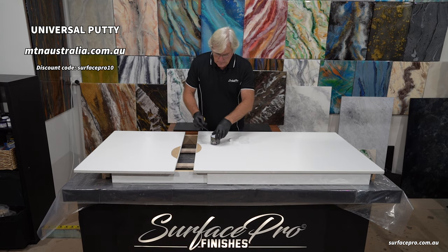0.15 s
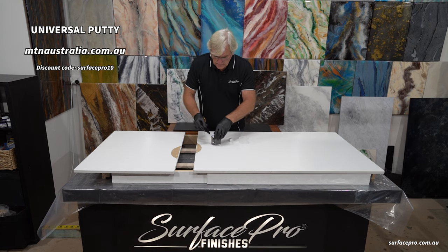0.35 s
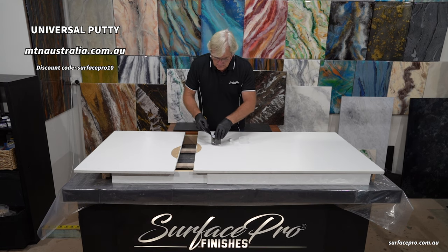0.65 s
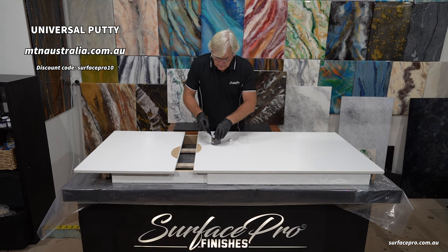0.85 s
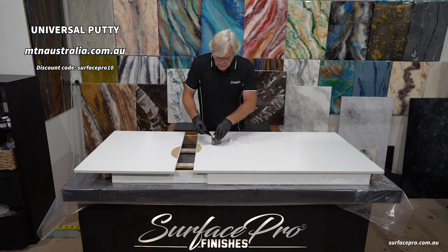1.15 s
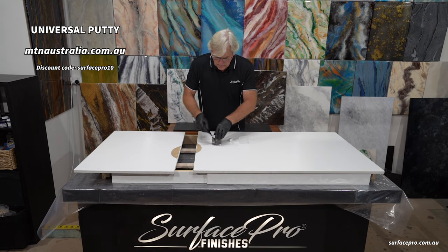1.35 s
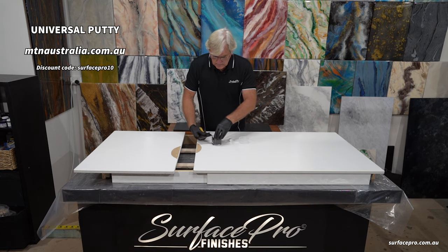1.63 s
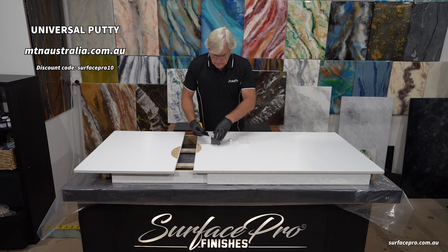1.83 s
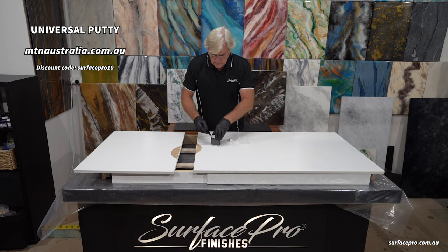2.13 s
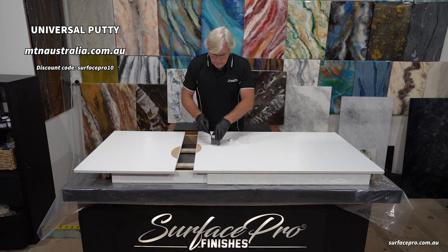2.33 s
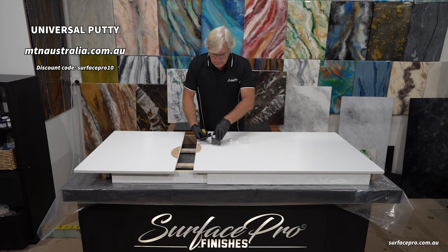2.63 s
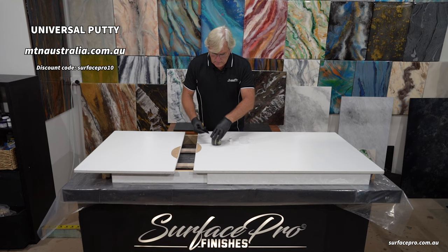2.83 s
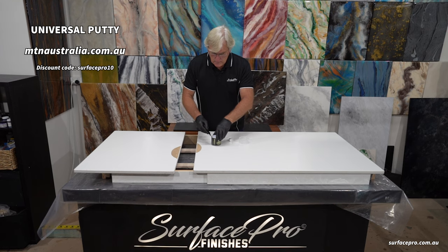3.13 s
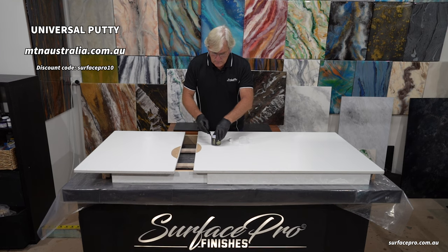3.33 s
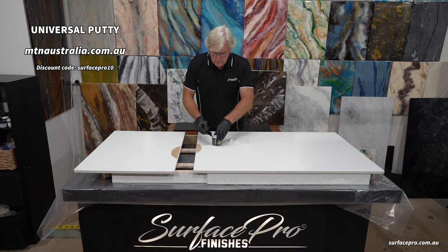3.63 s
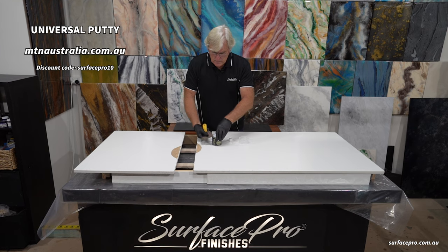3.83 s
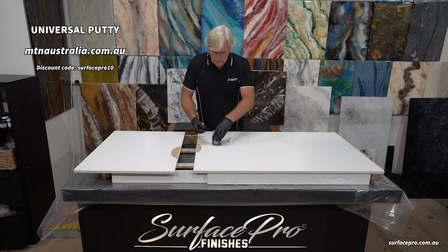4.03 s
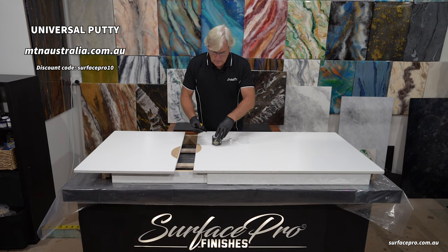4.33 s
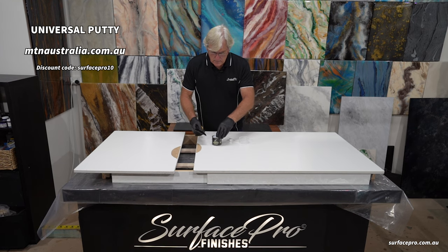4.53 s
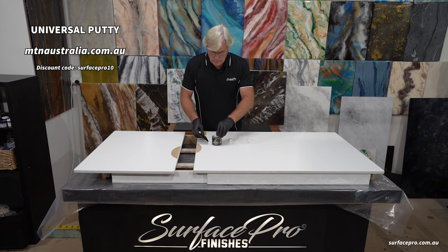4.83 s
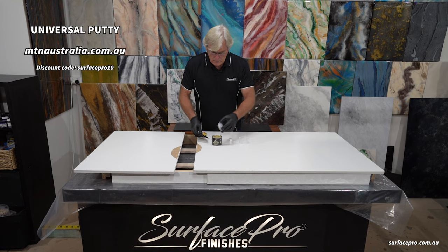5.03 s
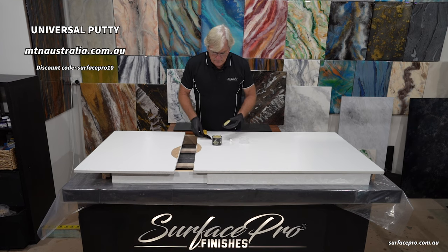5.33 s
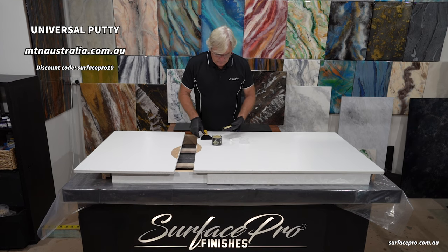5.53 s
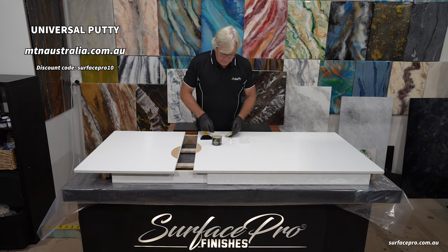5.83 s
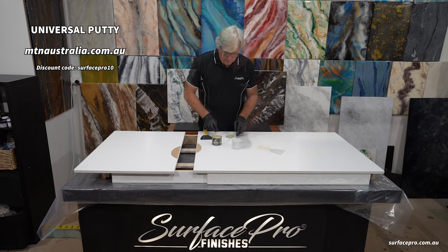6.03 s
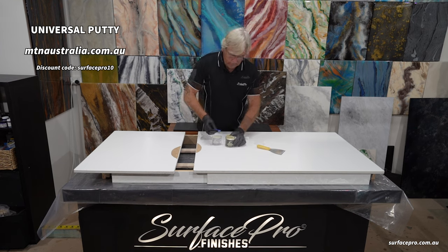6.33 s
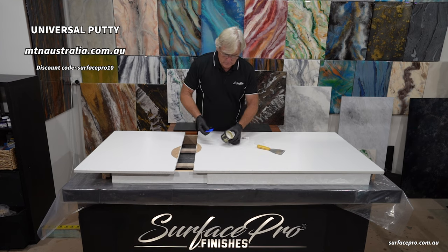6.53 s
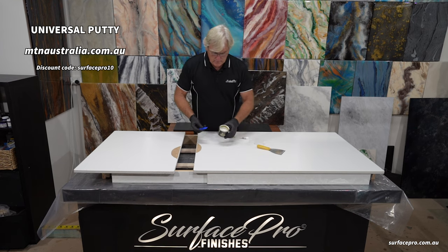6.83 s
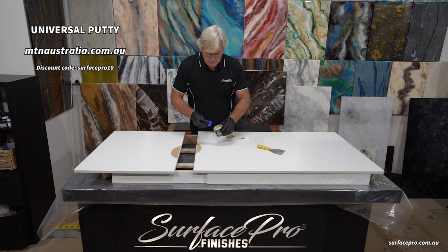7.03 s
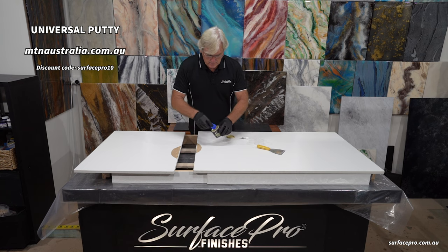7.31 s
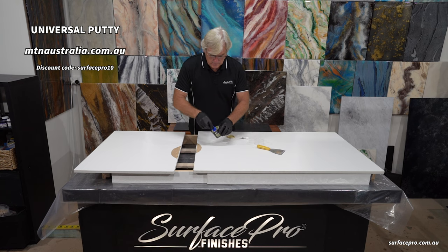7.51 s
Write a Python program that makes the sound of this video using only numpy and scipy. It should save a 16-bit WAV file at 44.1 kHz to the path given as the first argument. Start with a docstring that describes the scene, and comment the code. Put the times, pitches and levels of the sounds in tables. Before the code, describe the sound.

Close sounds of opening a tin on a workbench: faint knocks, a slow creak, hard blade scrapes with pauses, then a quick cluster of metallic flicks and a brief singing tone as the lid releases. A clunk, the lid scraping and ringing down, a rapid clatter of a loose knife on stone, then quiet rubbing and a soft low hum. Faint room air and thin whine beneath; tails cut short.

```python
"""Over room air and a thin whine, a small tin held in gloves shifts and knocks on a stone slab on a workbench.
A steel putty knife creeps along its rim, scrapes by stick and slip, and twangs on its modes as it slips free.
The lid gives way with a judder, the blade sings and flicks, and the lid is put down, scraping and ringing.
The knife is dropped and clatters to rest; a hum swells as the tin is picked up and turned in the gloves.
Noise reflections give each contact its room, and an expander shortens the tails of nearly all contacts."""
import sys
import numpy as np
from scipy import signal
from scipy.fft import rfft, irfft
from scipy.io import wavfile
from scipy.ndimage import uniform_filter1d

SR = 44100
rng = np.random.default_rng(int(sys.argv[2]) if len(sys.argv) > 2 else 0)


def dump_mix(stems):
    """Bounce the given channels to the path in sys.argv[1] as a 16-bit WAV at rate SR."""
    frames = np.atleast_2d(stems).T  # one column per channel
    limited = np.clip(frames, -1, 1)  # hard clip at full scale
    pcm = np.round(limited * 32767).astype(np.int16)
    wavfile.write(sys.argv[1], SR, pcm)


N = 338327
TIME = np.arange(N) / SR
RING_S = .55
AGE = np.arange(int(RING_S * SR)) / SR  # seconds since a contact

# Drags of the blade along the tin or over the slab, and one scrape of the lid as it is put down (5.546 s).
# Each row: start in seconds, build-up in seconds, level in dB, weight in dB, sharpness in dB,
# bending level in dB, tin wall level in dB, top of the wall's ring in Hz, shimmer level in dB.
SCRAPES = [(1.463, 0.021, -43.5, -6.5, 0.5, -51.5, -46.5, 1693, -65),
           (1.505, 0.0091, -29, -16.5, 5.5, -20, -22.5, 3800, -39.5),
           (1.551, 0.014, -37, -7, -4, -58, -31, 3860, -56.5),
           (2.554, 0.0056, -20.5, -16.5, -14.5, -23.5, -23.5, 3130, -54.5),
           (2.644, 0.012, -19.5, -38.5, -12.5, -55, -35.5, 4030, -67),
           (3.425, .0053, -49.5, 8, 9.5, -38.5, -48, 3800, -57.5),
           (3.779, 0.012, -15.5, -1.5, -13, -24.5, -28.5, 3460, -43.5),
           (4.081, 0.0081, -31.5, -29, -1, -39.5, -25.5, 1940, -27.5),
           (5.347, 0.01, -17, -5.5, -10.5, -38, -27.5, 1800, -48.5),
           (5.546, 0.0097, -28.5, -0.5, 6.5, -55, -52, 4000, -43.5),
           (6.037, .014, -36, -25, 20, -26.5, -40.5, 4050, -33.5),
           (6.075, 0.017, -39.5, 4.5, 1.5, -60.5, -35.5, 4030, -48.5)]
# Broad resonances of thin steel near its edge. Each row: frequency in Hz, width in Hz, peak in dB.
EDGE = [(2600, 580, -5), (4900, 55, 11), (6400, 2500, -1.5), (10800, 2800, -10.5)]
# Shimmering modes of the blade. Each row: frequency in Hz, level in the hand in dB, level lying loose in dB.
SHIMMER = [(4640, -14, -2), (4818, -1, 2), (4947, -1, -8), (5443, -9, -5), (6480, 1, -3), (6751, -1, -14),
           (6885, -5, -8), (7133, -3, -5), (8230, -7, -22), (8436, -4, -24), (8725, -1, -15),
           (10067, -4, -19), (10449, -6, -19), (11380, -15, -28), (12172, -14, -26), (15089, -14, -34)]
# Bending mode: lower while the blade is wedged under the lid, higher as the lid gives way.
# Each row: time in seconds, frequency in Hz.
BEND = [(1.5, 1037), (2.5, 1012), (4.0, 1077)]


def amp(db):
    """The decibel is logarithmic: 20 dB is a factor of ten in amplitude."""
    return 10 ** (np.asarray(db) / 20)


def unit(x):
    """Normalisation: mean power is set to 1."""
    return x / np.sqrt(np.mean(x ** 2))


def burst(x, db):
    """Energy equivalence: a short sound gets the energy of 50 ms at this rms level."""
    return x * amp(db) / np.sqrt(np.sum(x ** 2) / (.05 * SR))


def fade(t60):
    """Exponential decay: the level falls by 60 dB in t60 seconds."""
    return np.exp(-np.log(1000) * AGE / max(t60, 1 / SR))


def band(x, lo_hz, hi_hz, order=3):
    """Band-pass filtering, causal, so that nothing sounds ahead of its blow."""
    sos = signal.butter(order, [lo_hz, min(hi_hz, SR / 2 - 1)], "band", fs=SR, output="sos")
    return signal.sosfilt(sos, x)


def through(x, response):
    """Linear response: the output is the excitation convolved with the impulse response."""
    return signal.fftconvolve(x, response)[:len(x)]


def add(out, s, x):
    """Superposition: a sound is summed in from a time in seconds."""
    start = max(int(s * SR), 0)
    out[start:start + len(x)] += x[:N - start]


def coloured(points):
    """Spectral shaping: white noise is weighted by (Hz, dB) points along a logarithmic frequency axis."""
    hz, db = np.transpose(points)
    log_hz = np.log(np.fft.rfftfreq(N, 1 / SR) + 1)
    gain = amp(np.interp(log_hz, np.log(hz), db))
    return unit(irfft(rfft(rng.standard_normal(N)) * gain, N))


def background():
    """Steady sources: shaped noise for room air, a sine hum, and a whine as a harmonic series."""
    # Spectrum of the air. Each row: frequency in Hz, level in dB.
    air_colour = [(15, -64.5), (25, -16), (123, -4.5), (489, -12.5), (1650, -22), (2280, -29.5),
                  (2480, -25), (16000, -29.5)]
    # Hum, swelling near the end. Each row: time in seconds, level in dB.
    hum_levels = [(6.2, -76), (6.5, -55), (7.3, -55), (7.67, -61)]
    air_db, hum_hz, whine_hz = -69, 123.5, 400
    hum = amp(np.interp(TIME, *np.transpose(hum_levels))) * np.sin(2 * np.pi * hum_hz * TIME)
    # each harmonic is half a decibel weaker than the one below
    whine = sum(amp(-80 - k / 2) * np.sin(2 * np.pi * k * whine_hz * TIME + k * k) for k in range(1, 11))
    return amp(air_db) * coloured(air_colour) + np.sqrt(2) * (hum + whine)


def shifting(rough_db=1.5):
    """Friction noise: the tin rubs unevenly on slab and gloves; the same noise also lends one faint room tail."""
    # Spectrum of the noise. Each row: frequency in Hz, level in dB.
    rub_colour = [(40, -19), (110, -2), (300, -2.5), (1400, -9.5), (3000, -17.5), (8000, -23.5),
                  (16000, -38.5)]
    # Rubs of the tin on the slab, and one faint room tail dying away after a loud scrape (2.767 s).
    # Each row: start in seconds, end in seconds, level in dB.
    swells = [(-0.004, 0.062, -57), (0.323, 0.352, -51), (1.21, 1.342, -60), (2.767, 2.891, -52),
              (6.477, 6.556, -75)]
    # The tin picked up and turned in the gloves: start in seconds, end in seconds, level in dB.
    held = (6.5, 7.45, -61)
    rise_db_per_s, fall_db_per_s = 161, 121.5
    grip_db, rest_db = -27, -72  # grip relative to its scrape; resting hands

    def swell_gain(start_s, end_s, db):
        """Exponential growth and decay on either side of a steady level."""
        rise = rise_db_per_s * np.maximum(start_s - TIME, 0)
        fall = fall_db_per_s * np.maximum(TIME - end_s, 0)
        return amp(db - rise - fall)

    # the tin also shifts as each scrape takes hold
    grips = [(s, s, db + grip_db) for s, _, db, *_ in SCRAPES]
    loudest = np.max([swell_gain(*row) for row in swells + grips + [held]], axis=0)
    catch = unit(uniform_filter1d(rng.standard_normal(N), size=900))
    return coloured(rub_colour) * np.maximum(loudest, amp(rest_db)) * amp(rough_db * catch)


def force(build_s, grit_db=6.0):
    """Impact or stick-slip: a single impulse, or a swell of random jerks while the edge drags."""
    jerks = rng.standard_normal(len(AGE)) * amp(grit_db * rng.exponential(size=len(AGE)).clip(0, 3))
    jerks *= rng.random(len(AGE)) < .12  # the edge slips only now and then
    if build_s < .001:
        return signal.unit_impulse(len(AGE))
    swell = AGE / build_s
    return jerks * swell ** 2 * np.exp(-2 * np.minimum(swell, 50))


def workshop(t60, direct_db=-7, late_db=-33, late_t60=0.98, gather_s=0.004):
    """Room response: direct crack, gathering reflections and a faint long tail, drawn anew for each contact."""
    crack, early, late = rng.standard_normal((3, len(AGE)))
    early = early * (1 - np.exp(-AGE / gather_s))
    direct = burst(crack * fade(0.0036), direct_db)
    return direct + burst(early * fade(t60), 0) + burst(late * fade(late_t60), late_db)


def even(x, size=4096, count=200):
    """Minimum-phase whitening: broad holes and humps are levelled, so that only the struck body colours a burst."""
    power = uniform_filter1d(np.abs(rfft(x, size)) ** 2, size=12)
    cepstrum = irfft(-np.log(power + 1e-12) / 2)
    # folding the cepstrum makes the inverse filter causal
    cepstrum[1:count] *= 2
    cepstrum[count:] = 0
    return through(x, irfft(np.exp(rfft(cepstrum)))[:2 * count])


def resonances(table):
    """Modal response: a flat part plus a damped cosine for each (Hz, width in Hz, dB) peak."""
    peaks = sum(amp(db) * 2 * np.pi * width / SR * np.exp(-np.pi * width * AGE) * np.cos(2 * np.pi * hz * AGE)
                for hz, width, db in table)
    return signal.unit_impulse(len(AGE)) + peaks


def contact(register_db, t60, build_s=0, weight_db=0, sharp_db=0, edge=None, clack_hz=2020):
    """Source and filter: one kind of force shakes bench, slab, tin wall, rim and edge, each in its register."""
    # Resonances of slab and bench. Each row: frequency in Hz, width in Hz, peak in dB.
    slab_modes = [(130.3, 10, 8), (193.4, 2.7, 6), (241.2, 12, 2), (395.7, 13, 3), (512, 50, 1.5),
                  (808, 11, -0.5), (940, 4.5, 3.5), (1190, 25, -0.5)]
    # registers: thud, knock, clack, clank, tick; weight drives bench and slab, sharpness rim and tick
    weight_share = np.array((0.96, 0.82, 0.0083, 0.035, 0.47))
    sharp_share = np.array((0.36, 0.019, 0.28, 0.85, 0.96))
    levels_db = register_db + weight_db * weight_share + sharp_db * sharp_share
    thud_db, knock_db, clack_db, clank_db, tick_db = levels_db
    push = force(build_s)
    body = through(even(through(push, workshop(t60, direct_db=-6))), resonances(slab_modes))
    steel = through(even(through(push, workshop(1.1 * t60, direct_db=-2.5))), edge)
    deepest_hz = np.clip(108 * 2 ** (-weight_db / 20), 90, 160)  # light contacts miss the deepest bass
    thud = burst(band(body, deepest_hz, 350), thud_db)
    knock = burst(band(body, 363, 880), knock_db)
    clack = burst(band(body, 920, clack_hz, order=4), clack_db)
    clank = burst(band(steel, 2300, 3680, order=3), clank_db)
    tick = burst(band(band(steel, 3300, 21000), 1200, 8400, order=2), tick_db)
    return thud + knock + clack + clank + tick


def ring(modes, db, t60, chatter_db, scatter_db=2, room_db=-3):
    """Modal superposition: the point of impact weights each mode, and chatter jogs them after the blow."""
    chance = rng.standard_normal((len(modes), 3))
    tone = sum(amp(mode_db + scatter_db * size) * np.sin(2 * np.pi * (hz * (1 + 0.0011 * detune) * AGE + phase))
               for (hz, mode_db), (size, detune, phase) in zip(modes, chance))
    tone = tone * fade(t60) * (1 - np.exp(-AGE / 0.0035))
    flutter = 1 + .5 * unit(uniform_filter1d(rng.standard_normal(len(AGE)), size=200))
    chatter = through(tone, force(0.011)) * flutter
    reflected = through(tone, workshop(0.23))
    return burst(burst(tone, 0) + burst(chatter, chatter_db) + burst(reflected, room_db), db)


def tin():
    """Impact excitation: knocks of the tin drive slab and rim, and the landing lid rings on its modes."""
    # Knocks on the slab. Each row: start in seconds, build-up in seconds, level in dB, weight in dB,
    # sharpness in dB.
    knocks = [(0.381, 0, -46, -1.5, -3.5), (0.768, 0.0063, -53, -1.5, 14),
              (0.889, 0.0053, -31.5, -6, -16.5), (1.306, 0.014, -38.5, -3.5, -8.5),
              (1.722, 0.00019, -30, -5, 7), (2.186, 0.00056, -52, 5, 15), (2.516, 0.0018, -21.5, -10, -11),
              (2.625, 0, -26.5, -2, -6.5), (3.221, 0.0012, -25.5, -10.5, -25.5),
              (3.391, 0.0059, -42, 1, 6.5), (3.536, 0, -42.5, 2, -5.5), (3.7, 0.0053, -35, -18, -10.5),
              (3.869, 0, -27, -1, 7.5), (5.034, 0.0014, -22.5, -2.5, -1), (5.24, 0.0023, -47, 0.5, 5),
              (5.52, 0.016, -40.5, 2, 11), (5.584, 0.0014, -34.5, 3.5, 10.5),
              (5.617, 0.012, -32.5, 1.5, 12), (5.651, 0.003, -41, -25.5, -5.5),
              (5.69, 0.001, -49.5, 1.5, -14), (6.172, 0.0041, -30, -5, 1.5), (6.424, 0.0082, -41, 1.5, -5)]
    # Modes of the lid. Each row: frequency in Hz, level in dB.
    lid_modes = [(2530, -3), (4134, 0), (6632, -12), (7913, -14), (8274, -13), (8721, -5)]
    # Landings of the lid. Each row: start in seconds, level in dB.
    landings = [(5.547, -23.5), (5.61, -35)]
    register_db, t60_s = (5.5, 4, -5, -13, -20), 0.26
    out, rim = np.zeros(N), resonances(EDGE)
    for s, build_s, db, weight_db, sharp_db in knocks:
        blow = contact(register_db, t60_s, build_s, weight_db, sharp_db, edge=rim, clack_hz=1836)
        add(out, s, amp(db) * blow)
    for s, db in landings:
        add(out, s, ring(lid_modes, db, t60=0.19, chatter_db=-6))
    return out


def snap(db, hz, t60=.018, attack_s=.0003, grit=.3, order=2):
    """Band-limited impulse: steel catches on a hard point, one sharp blow and a little decaying grit."""
    grains = grit * rng.standard_normal(len(AGE)) * fade(t60) * (1 - np.exp(-AGE / attack_s))
    crack = band(signal.unit_impulse(len(AGE)) + grains, hz / 1.235, hz * 1.26, order=order)
    return amp(db) * crack / np.abs(crack).max()


def creep():
    """Slow stick-slip: jerks of the blade along the rim ring one narrow resonance of the tin wall."""
    # One creep: start in seconds, build-up in seconds, level in dB, lowest and highest frequency in Hz.
    slow_drag = (1.27, 0.18, -47, 1260, 1640)
    s, build_s, db, lo_hz, hi_hz = slow_drag
    out = np.zeros(N)
    add(out, s, burst(band(force(build_s, grit_db=1.5), lo_hz, hi_hz, order=2), db))
    return out


def blade_edge():
    """Driven resonance: the shimmering modes of thin steel, broadened, stand out as grit drives them."""
    driven_width_hz, driven_db = 45, 14
    return resonances(EDGE + [(hz, driven_width_hz, driven_db + db) for hz, db, _ in SHIMMER])


def grind(build_s, db, top_hz):
    """Forced vibration: jerks of a scrape ring the tin wall; a blunter one leaves upper resonances still."""
    # Resonances of the tin wall. Each row: frequency in Hz, width in Hz, peak in dB.
    wall_modes = [(1696, 35, -8), (1830, 35, 0), (2090, 35, 1), (2260, 35, -4), (2660, 60, -6),
                  (2960, 60, -7), (3450, 35, -6)]
    wall = sum(amp(peak_db) * width * np.exp(-np.pi * width * AGE) * np.sin(2 * np.pi * hz * AGE)
               for hz, width, peak_db in wall_modes)
    jerks = even(through(force(build_s), workshop(0.32, direct_db=-4.5)))
    return burst(through(jerks, band(wall, 1400, max(top_hz, 1600), order=2)), db)


def twang(s, bend_db, ring_db, shimmer_db, loose=False):
    """Free vibration: the released blade bends, rings and shimmers; loose, it is damped and loses its top modes."""
    # Ringing modes of the blade. Each row: frequency in Hz, level in dB.
    blade_modes = [(2686, -16), (2918, -13), (3015, -12), (3372, 0)]
    bend_hz = np.interp(s, *np.transpose(BEND))
    shimmer_modes = [(hz, loose_db if loose else held_db) for hz, held_db, loose_db in SHIMMER]
    shimmer = ring(shimmer_modes, shimmer_db, t60=.14 if loose else .22, chatter_db=-3)
    bend = ring([(bend_hz, 0)], bend_db, t60=.17, chatter_db=-5)
    return bend + ring(blade_modes, ring_db, t60=0.19, chatter_db=-8) + shimmer


def judder(db):
    """Heavy damping: one skip of the blade's pinched tip along the rim rings only briefly."""
    tip_modes, t60_s = [(3340, 4), (5050, -12), (8300, -6)], 0.014  # each mode: Hz, dB
    tone = sum(amp(mode_db) * np.sin(2 * np.pi * hz * (1 + 0.024 * rng.standard_normal()) * AGE)
               for hz, mode_db in tip_modes)
    return amp(db) * fade(t60_s) * tone


def singing(start_s, end_s, db, attack_s=0.0042, t60=0.025):
    """Self-sustained oscillation: stick and slip hold the bending mode steady until the edge lets go."""
    release = np.exp(-np.log(1000) * np.maximum(AGE - (end_s - start_s), 0) / t60)
    envelope = (1 - np.exp(-AGE / attack_s)) * release
    bend_hz = np.interp(start_s, *np.transpose(BEND))
    return amp(db) * np.sqrt(2) * envelope * np.sin(2 * np.pi * bend_hz * AGE)


def prising():
    """Stick-slip and release: scrapes build up and ring near their height; the blade flicks, catches and sings."""
    # Catches on hard points, heard without the room. Each row: start in seconds, peak in dB, centre in Hz,
    # 60 dB decay of the grit in seconds.
    snaps = [(1.522, -5.5, 2340, 0.024), (2.562, -12.5, 2250, 0.018), (2.631, -6, 1110, 0.012),
             (2.6323, -8.5, 2730, 0.017), (2.648, -24, 3450, 0.0097), (3.793, -15.5, 3200, 0.031),
             (3.8693, -10, 1460, 0.013), (3.933, -16, 1260, 0.023), (3.9656, -8, 2390, 0.016),
             (4.124, -21, 5300, 0.018), (5.363, -12, 3700, 0.014), (5.557, -13.5, 3350, 0.015),
             (5.586, -23, 3700, .01), (5.618, -6, 3530, 0.0079), (5.662, -16.5, 3350, 0.019),
             (.892, -39, 2760, 0.093), (4.332, -28, 3000, 0.0094), (4.364, -28, 2900, 0.018),
             (5.034, -26.5, 6280, 0.0083), (5.653, -18, 3370, .012)]
    # Flicks of the tip off an edge. Each row: start in seconds, level in dB, bending level in dB, ring in dB.
    flicks = [(1.712, -48, -71, -45), (2.157, -56, -72.5, -56), (2.518, -57, -26.5, -48),
              (3.93, -41.5, -35.5, -49.5), (3.968, -37, -66.5, -34.5), (4.041, -51.5, -63, -37),
              (4.091, -33, -47, -52.5), (4.123, -39.5, -45, -47), (4.164, -40, -56.5, -41),
              (4.207, -36.5, -33, -38.5), (4.228, -40, -17, -39), (4.274, -51.5, -35, -36.5),
              (4.331, -40.5, -27, -44), (4.467, -53.5, -40, -59), (4.557, -57.5, -55.5, -63)]
    # Skips of the tip as the lid gives way. Each row: start in seconds, level in dB.
    judders = [(3.9705, -16), (3.974, -11.5), (3.982, -13), (3.9845, -17)]
    # The dragging edge keeps the blade singing: start in seconds, end in seconds, level in dB.
    song = (4.232, 4.284, -16.5)
    scrape_db, scrape_t60_s = (1, 0, -3.5, -1.5, -7), 0.29
    flick_db, flick_t60_s, flick_build_s = (2, 6, 3, -4, -4), 0.25, 0.0015  # brief chatter at each touch
    out, edge = np.zeros(N), blade_edge()
    add(out, song[0], singing(*song))
    for s, build_s, db, weight_db, sharp_db, bend_db, wall_db, top_hz, shimmer_db in SCRAPES:
        scrape = contact(scrape_db, scrape_t60_s, build_s, weight_db, sharp_db, edge=edge)
        add(out, s, amp(db) * scrape + grind(build_s, wall_db, top_hz))
        add(out, s + 0.72 * build_s, twang(s, bend_db, db - 23, shimmer_db))
    for s, db, bend_db, ring_db in flicks:
        touch = amp(db) * contact(flick_db, flick_t60_s, flick_build_s, edge=edge)
        add(out, s, touch + snap(db + 16.5, hz=7550) + twang(s, bend_db, ring_db, db - 5.5))
    for s, db, hz, t60 in snaps:
        add(out, s, snap(db, hz, t60))
    for s, db in judders:
        add(out, s, judder(db))
    return out


def dropped_knife():
    """Repeated impact: each bounce cracks on stone, shakes the slab and sets the loose blade ringing."""
    # Bounces until the knife lies still. Each row: start in seconds, level in dB, peak of the crack in dB,
    # centre of the crack in Hz, ring level in dB.
    bounces = [(5.901, -37, -28, 2800, -58), (5.914, -33.5, -19.5, 2510, -35),
               (6.028, -34, -10, 2640, -30.5), (6.046, -28.5, -11, 3130, -18.5),
               (6.111, -29.5, -10, 2900, -38), (6.122, -25.5, -2.5, 2820, -26.5),
               (6.201, -32.5, -4, 2830, -19.5), (6.269, -30.5, -7.5, 2990, -24),
               (6.323, -34.5, -9, 2940, -24.5), (6.362, -33, -18, 3230, -37), (6.374, -36, -16, 3250, -47),
               (6.402, -54.5, -24, 2940, -48)]
    register_db, t60_s, build_s = (-14, -12.5, -13.5, -3, -19), 0.25, 0.0033  # brief chatter at each touch
    out, edge = np.zeros(N), blade_edge()
    for s, db, crack_db, crack_hz, ring_db in bounces:
        blow = amp(db) * contact(register_db, t60_s, build_s, edge=edge)
        crack = snap(crack_db, crack_hz, order=3)
        add(out, s, blow + crack + twang(s, db - 15, ring_db, db - 12, loose=True))
    return out


def expander(x, threshold_db=-40, slope=0.94, depth_db=7):
    """Downward expansion: sound under the threshold is turned down further, so tails end early."""
    level_db = 10 * np.log10(np.abs(uniform_filter1d(x ** 2, size=500)) + 1e-12)
    cut_db = np.clip(slope * (threshold_db - level_db), 0, depth_db)
    return x * amp(-uniform_filter1d(cut_db, size=200))


def drop_out(x):
    """Crossfade to a low-pass: for a few milliseconds at a time only the bass is left."""
    # Brief losses of everything above the bass. Each row: start in seconds, end in seconds.
    dropouts = [(1.771, 1.777), (1.792, 1.798), (1.83, 1.843), (2.726, 2.732)]
    is_gap = sum(1. * ((TIME > start_s) & (TIME < end_s)) for start_s, end_s in dropouts)
    gap = uniform_filter1d(is_gap, size=30)
    bass = signal.sosfiltfilt(signal.butter(2, 250, fs=SR, output="sos"), x)
    return x + gap * (bass - x)


def scene():
    """Superposition: expanded contacts of tin and knife over creeping, rubbing and the quiet room."""
    contacts = expander(tin() + prising() + dropped_knife())
    return (contacts + creep() + shifting() + background())[None]


def record(dry):
    """Soft saturation rounds the highest peaks, and a steep low-pass cuts the top."""
    top_hz = 15900
    rounded = 2 * np.tanh(drop_out(dry) / 2)
    return signal.sosfilt(signal.ellip(8, .2, 70, top_hz, fs=SR, output="sos"), rounded)


dry = scene()
out = record(dry)
dump_mix(out)
```